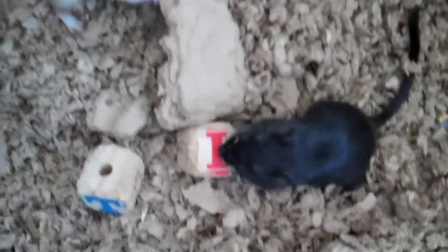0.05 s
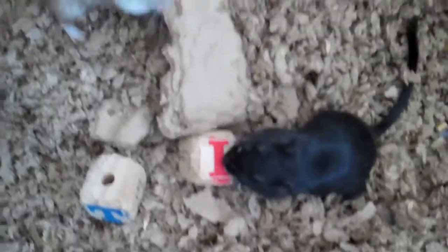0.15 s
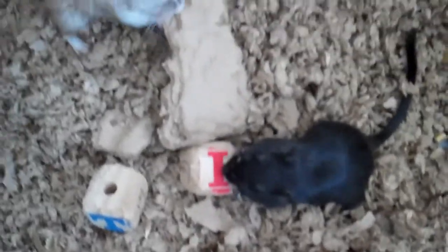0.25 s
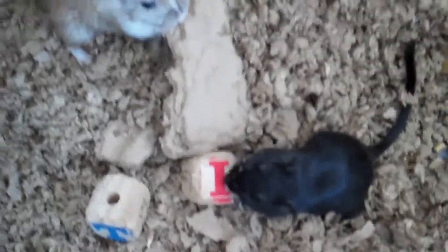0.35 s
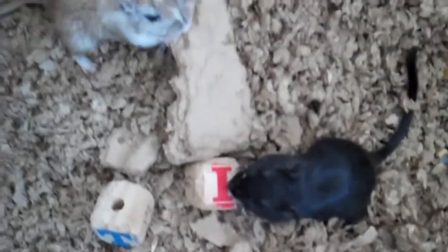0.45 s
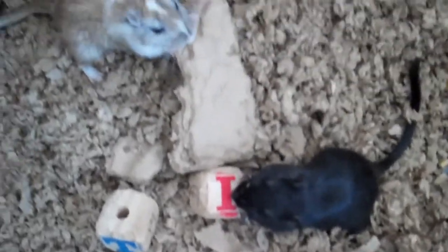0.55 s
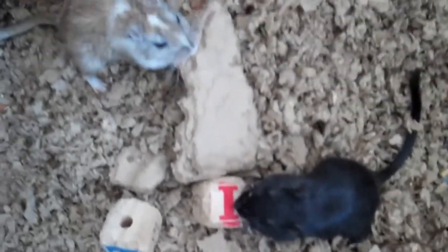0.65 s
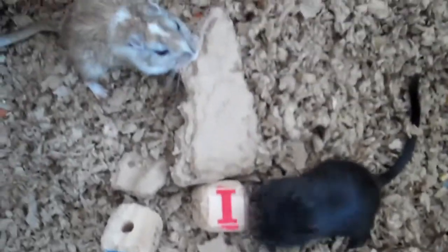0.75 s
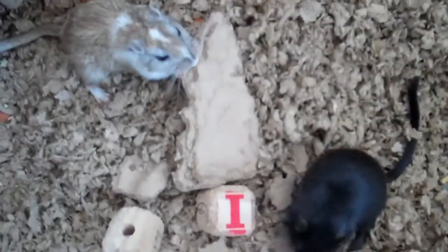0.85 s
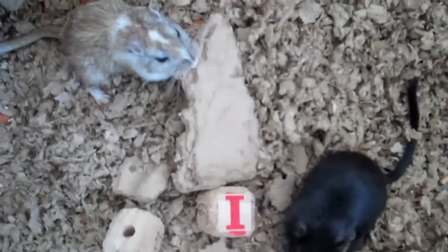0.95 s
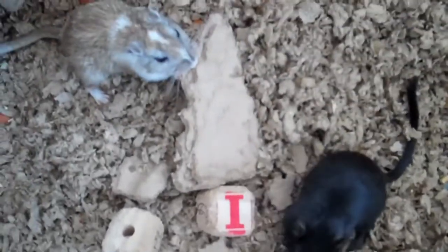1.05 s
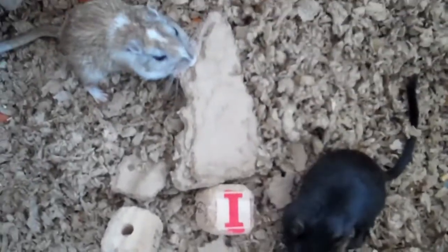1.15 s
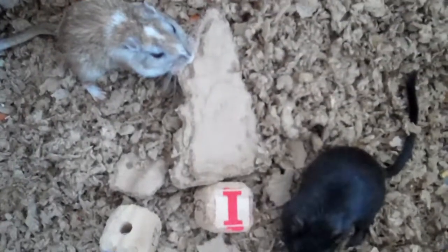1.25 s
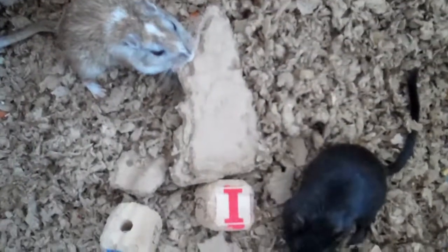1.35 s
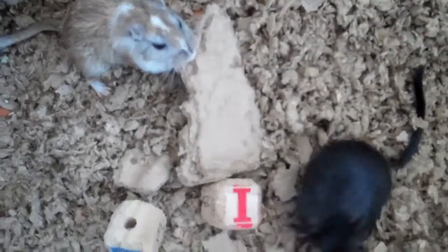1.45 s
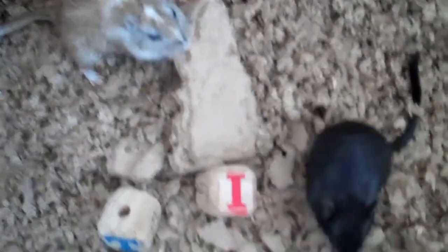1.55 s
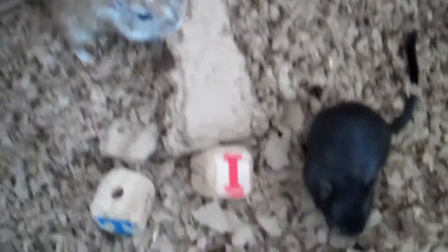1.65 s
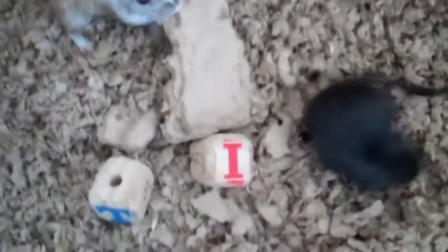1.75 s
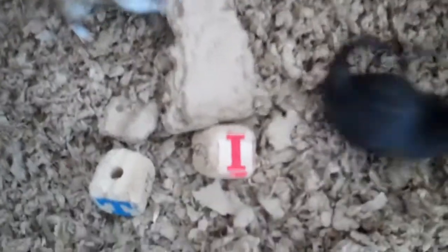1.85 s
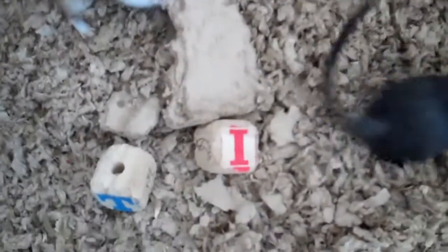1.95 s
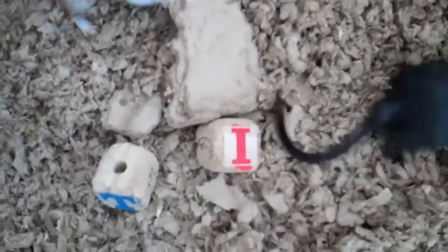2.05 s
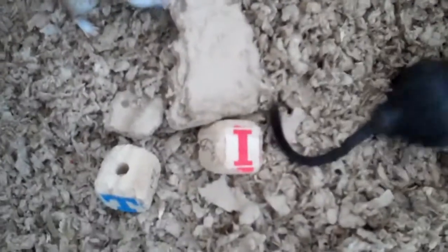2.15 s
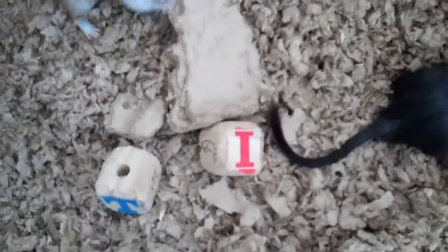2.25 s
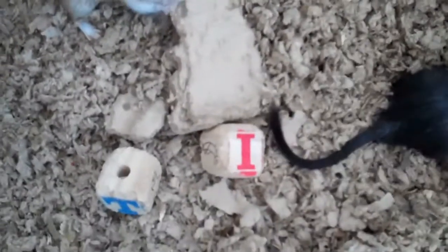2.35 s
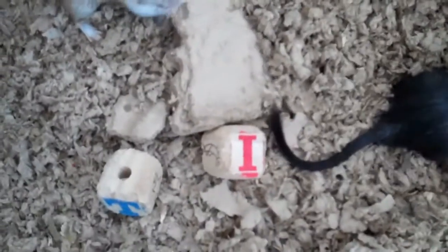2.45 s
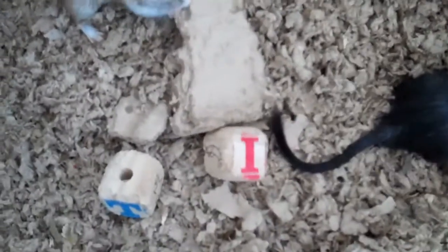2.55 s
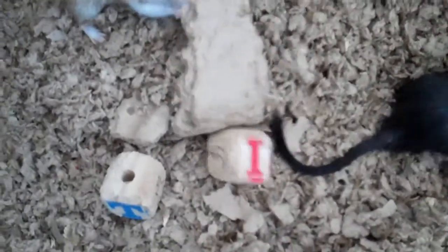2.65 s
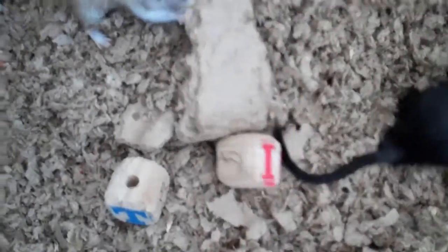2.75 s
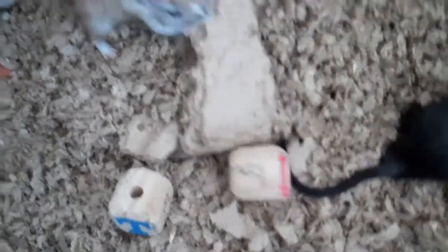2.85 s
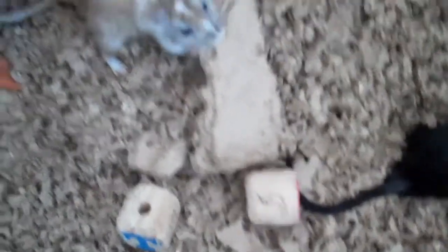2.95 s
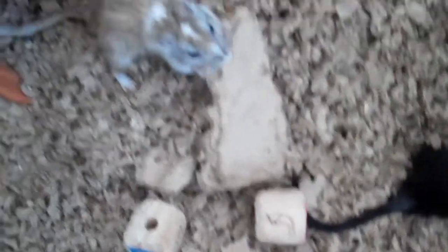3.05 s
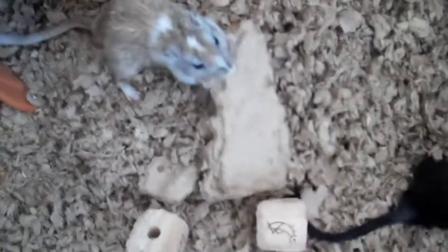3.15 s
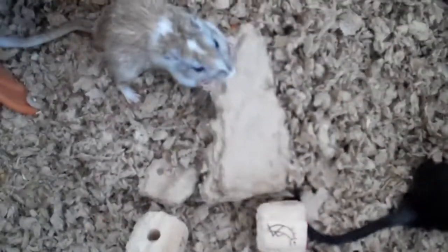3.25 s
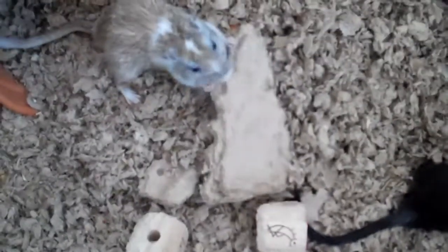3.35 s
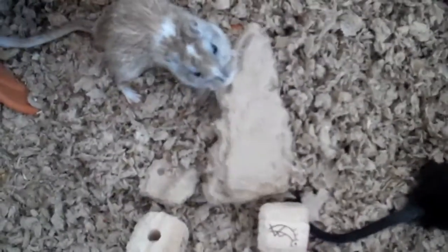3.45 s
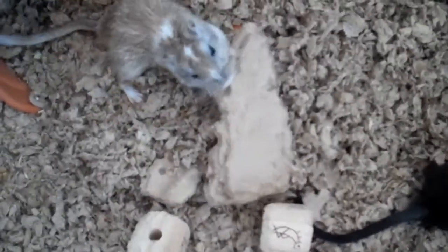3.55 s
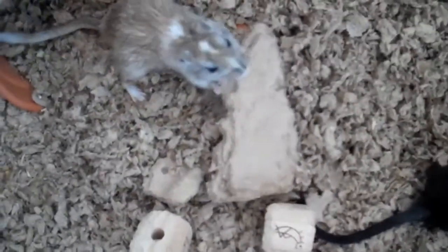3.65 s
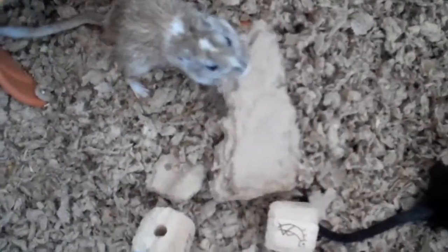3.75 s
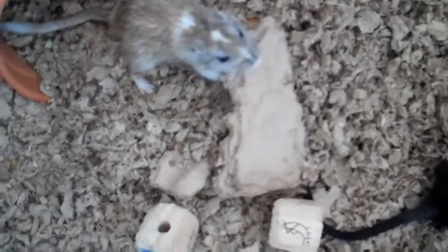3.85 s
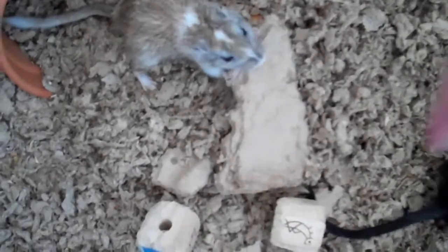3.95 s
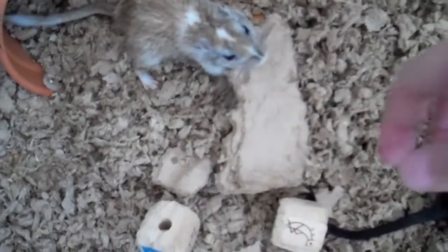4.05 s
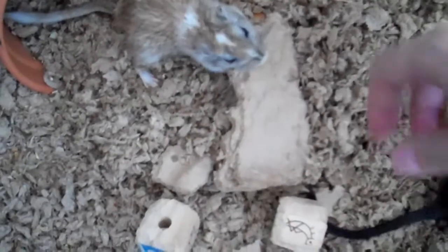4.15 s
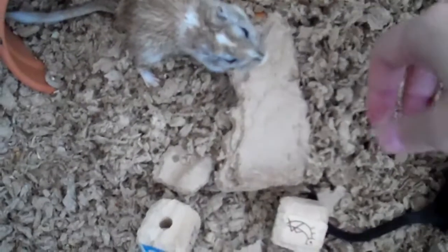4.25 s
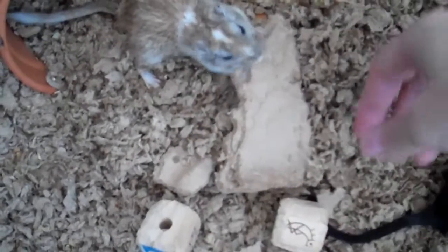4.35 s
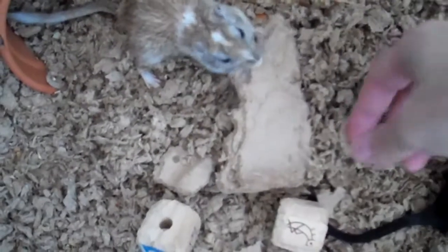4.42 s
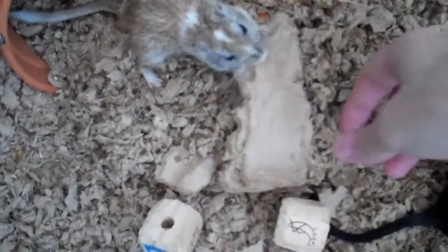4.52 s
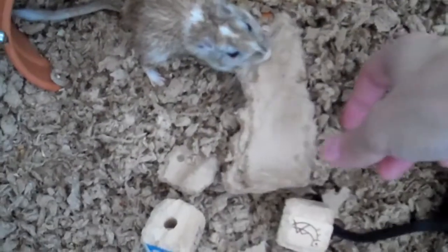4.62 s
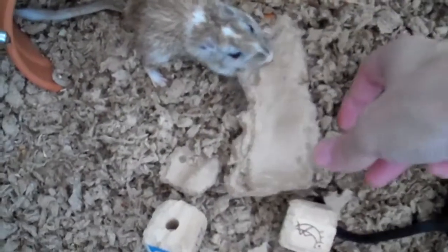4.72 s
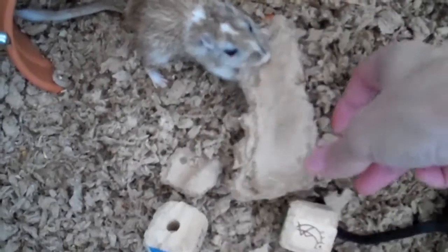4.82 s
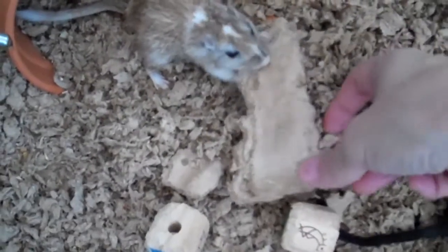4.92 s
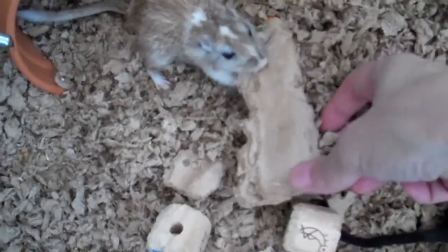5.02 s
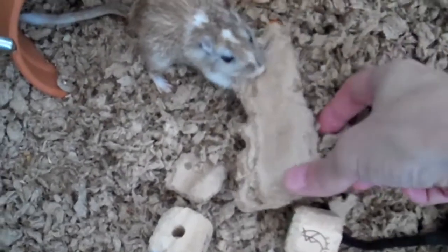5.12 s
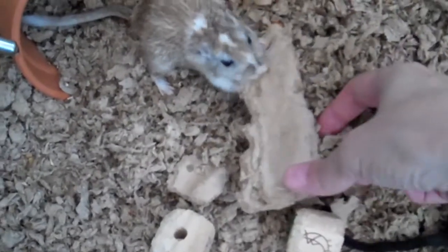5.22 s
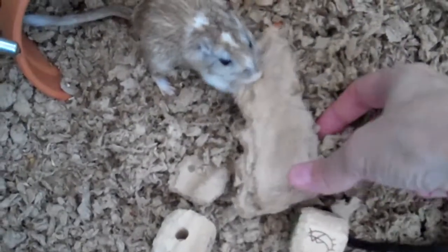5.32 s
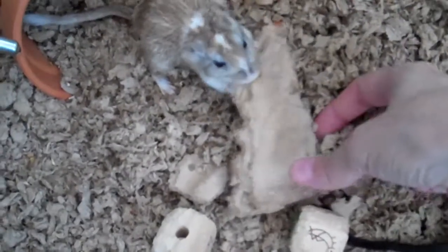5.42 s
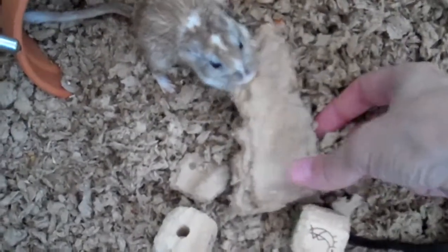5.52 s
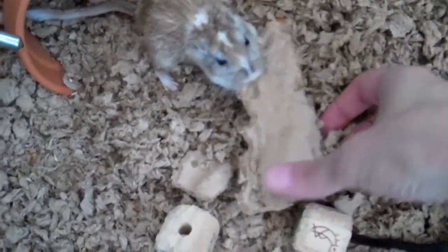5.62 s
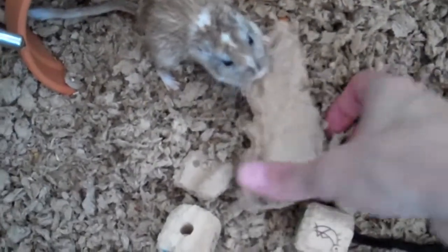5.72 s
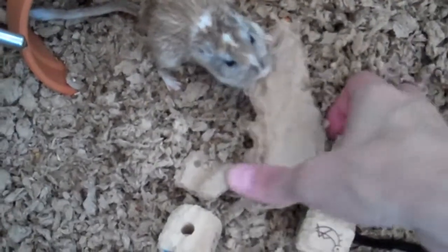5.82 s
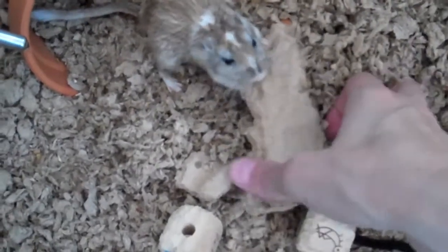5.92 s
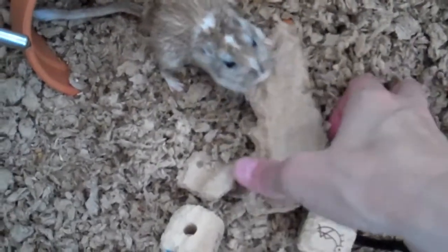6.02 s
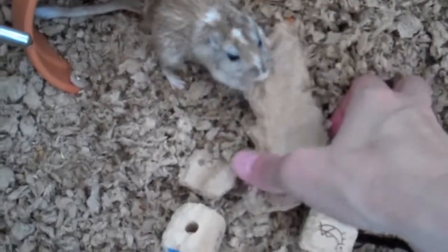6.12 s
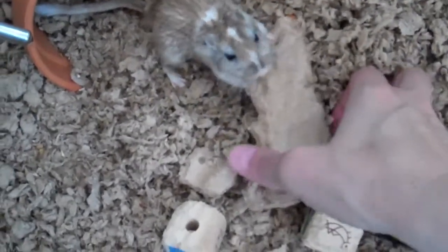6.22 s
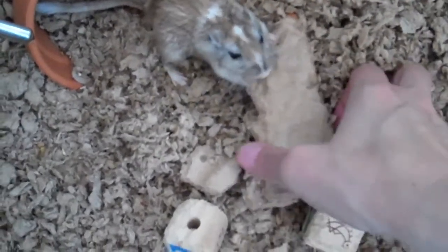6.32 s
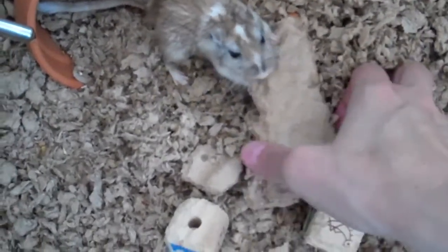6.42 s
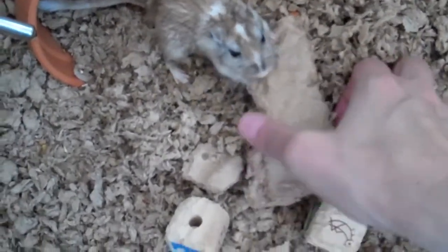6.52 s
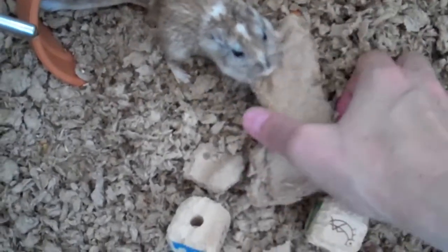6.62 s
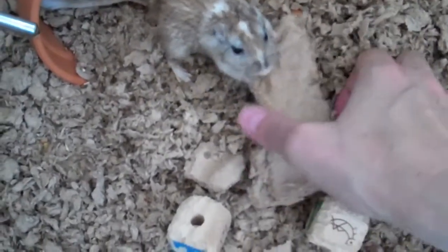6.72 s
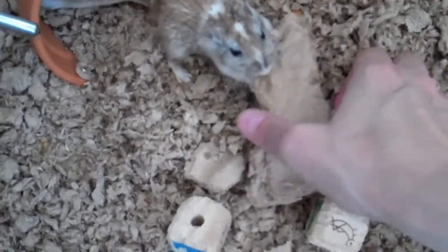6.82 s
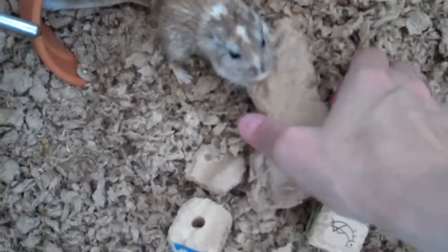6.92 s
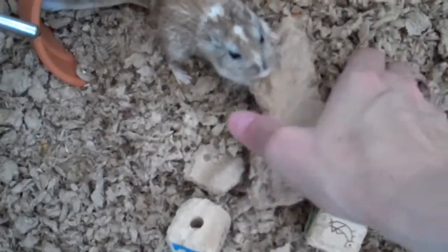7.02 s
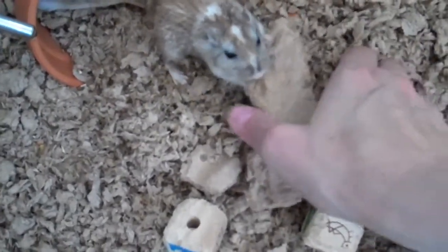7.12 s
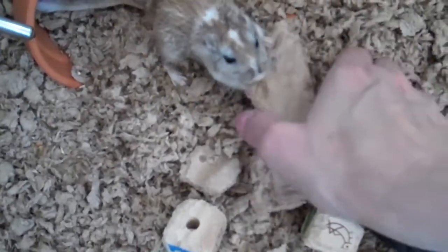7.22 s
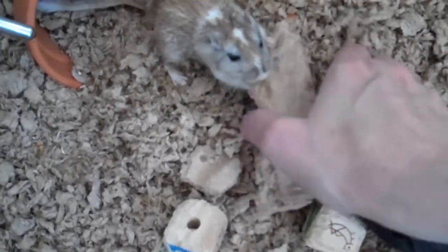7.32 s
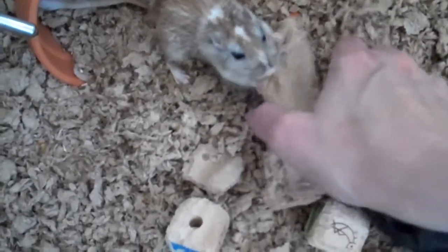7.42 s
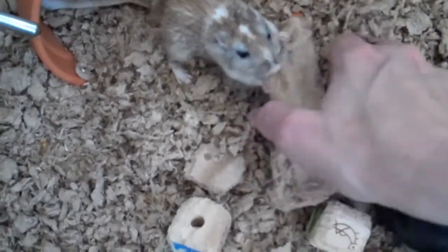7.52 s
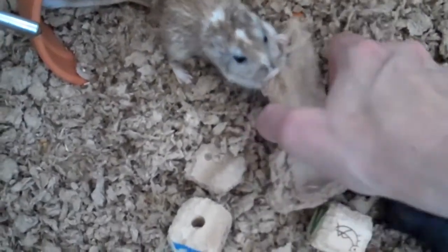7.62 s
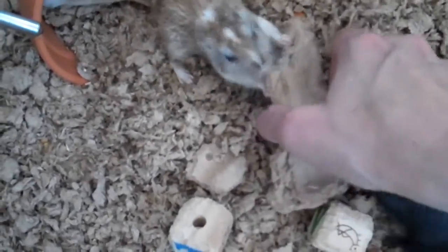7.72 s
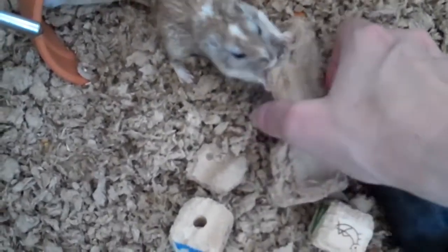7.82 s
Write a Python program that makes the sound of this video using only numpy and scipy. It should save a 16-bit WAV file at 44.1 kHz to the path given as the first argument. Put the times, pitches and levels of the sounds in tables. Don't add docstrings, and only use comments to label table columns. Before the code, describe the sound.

Rapid tooth snaps on wood give way to regular, fibrous nibbling on card, close up, over gentle bedding rustle and faint hiss.

```python
import sys
import numpy as np
from scipy import signal
from scipy.fft import rfft, irfft, next_fast_len
from scipy.io import wavfile
from scipy.ndimage import uniform_filter1d

SR = 44100
rng = np.random.default_rng(int(sys.argv[2]) if len(sys.argv) > 2 else 0)


def gain_from_db(level_db):
    decades = np.asarray(level_db, float) / 20
    return 10 ** decades


def log_audio(samples):
    frames = np.atleast_2d(samples).T
    limited = np.clip(frames, -1, 1)
    pcm = np.round(limited * 32767).astype(np.int16)
    wavfile.write(sys.argv[1], SR, pcm)


N = 347067


def unit(x):
    return x / np.sqrt(np.mean(x ** 2))


def butter(x, order, hz, kind="low"):
    return signal.sosfilt(signal.butter(order, hz, kind, fs=SR, output="sos"), x)


def level_over_time(table):
    s, db = np.transpose(table)
    return np.interp(np.arange(N) / SR, s, db)


def colour(x, points):
    hz, db = np.transpose(points)
    size = next_fast_len(N)
    bins = np.maximum(np.arange(size // 2 + 1) * SR / size, 1)
    gain = gain_from_db(np.interp(np.log(bins), np.log(hz), db))
    return irfft(rfft(x, size) * gain, size)[..., :N]


def walk(rate):
    hold = int(SR / rate)
    steps = np.repeat(rng.standard_normal(N // hold + 1), hold)
    return uniform_filter1d(steps, hold)[:N]


def add(out, s, sound):
    i = int(s * SR)
    out[:, i:i + sound.shape[1]] += sound[:, :N - i]


# frequency in Hz, level in dB per Hz.
AIR_SPECTRUM = [(20, -15), (60, -6), (130, -2), (250, -7.5), (500, -9), (1000, -12), (2500, -11.5),
                (4500, -11), (7000, -17.5), (10000, -25), (13000, -33), (16000, -47)]
# time in seconds, level in dB.
HOUSE_RUMBLE = [
    (0.0, -63),
    (2.72, -69),
    (7.87, -72),
]


def air():
    hiss = colour(rng.standard_normal((3, N)), AIR_SPECTRUM)
    shared = butter(hiss[0] - hiss[1:], 1, 300)
    level_db = -59.5 + np.array([[3.0], [1.5]])
    hiss = unit(hiss[1:] + 0.66 * shared) * gain_from_db(level_db)
    low = butter(rng.standard_normal((3, N)), 2, [28, 50], "band")
    rumble = unit(low[0] + .5 * low[1:])
    return hiss + rumble * gain_from_db(level_over_time(HOUSE_RUMBLE) - 3.0)


# time in seconds, level in dB.
DIGGING = [(0.0, -59.5), (0.2, -55.5), (0.9, -60.5), (1.35, -63.5), (1.63, -52.5), (2.22, -56),
           (2.5, -53.5), (2.9, -68), (3.3, -85), (3.55, -56.5), (4.45, -63.5), (4.9, -56), (7.0, -60.5),
           (7.86, -53.5)]
# middle in seconds, length in seconds, level in dB.
SCRAPES = [(0.106, 0.045, -57), (0.41, .05, -51.5), (1.013, 0.1, -53), (1.491, 0.032, -52.5),
           (1.95, 0.36, -51.5), (2.386, 0.1, -54), (2.595, 0.027, -46), (2.77, 0.078, -50),
           (3.058, 0.25, -53.5), (3.67, 0.078, -57), (3.853, 0.29, -57), (4.11, .1, -55),
           (4.303, 0.043, -57.5), (4.621, 0.092, -49), (4.825, .04, -53), (5.273, 0.063, -51.5),
           (5.527, 0.044, -55), (6.306, 0.062, -51), (6.456, 0.23, -53), (6.57, .05, -57),
           (6.684, .05, -52), (7.109, 0.062, -52), (7.28, 0.086, -51), (7.495, .05, -50.5),
           (7.708, 0.073, -67), (7.58, 0.093, -52), (7.793, 0.069, -54), (7.86, .1, -44.5)]


def stirring():
    t = np.arange(N) / SR
    power = gain_from_db(2 * level_over_time(DIGGING))
    for middle, length, db in SCRAPES:
        swell = np.clip(1 - (2 * (t - middle) / length) ** 2, 0, 1) ** 2
        power = power + gain_from_db(2 * db) * swell
    return 10 * np.log10(power)


# frequency in Hz, level in dB per Hz.
SHAVINGS = [(900, 0), (2000, 4.5), (4000, 6), (5500, -2.5), (8000, -3.5), (11000, -10.5), (15000, -22.5)]


def rustle(density=.15, spread_db=2.8, apart=.5):
    size_db = spread_db * np.minimum(rng.exponential(size=(2, N)), 3)
    struck = rng.random((2, N)) < density
    flakes = rng.standard_normal((2, N)) * struck * gain_from_db(size_db)
    gusts_db = stirring() - 5 + 3 * walk(30)
    mid, side = unit(colour(flakes, SHAVINGS)) * gain_from_db(gusts_db)
    both = np.array([mid + apart * side, mid - apart * side])
    bright = butter(both, 2, 6000, "high")
    treble_db = 8
    return (both + (gain_from_db(treble_db) - 1) * bright) * gain_from_db([[.8], [-.8]])


def body(modes, size=512):
    t = np.arange(size) / SR
    hz, width, db = (c[:, None] for c in np.transpose(modes))
    slip = 1 - np.exp(-t / .00006)
    rings = gain_from_db(db) * np.exp(-np.pi * width * t) * np.sin(2 * np.pi * hz * t) * slip
    stiff = butter(rings, 6, 1450, "high")
    groups = np.digitize(hz[:, 0], [1400, 2800, 5200]) == np.arange(4)[:, None]
    return np.where(hz > 1400, stiff, rings), groups


def broken(*tables, knock_db=0, splinters=2):
    rows = np.concatenate(tables)
    chance = rng.random((len(rows), splinters, 3))
    late = .012 * chance[..., 0] + .002
    softer = -15 - 8 * chance[..., 1]
    brighter = 12 * chance[..., 2] - 6
    small = rows[:, None] + np.stack([late, softer, brighter], axis=2)
    s, peak_db, bright_db = np.concatenate([rows, small.reshape(-1, 3)]).T
    middle_db = 5 - 0.1 * np.abs(bright_db) / 2
    rings_db = np.array([-bright_db / 2, middle_db, bright_db / 2])
    total_db = 10 * np.log10(np.sum(gain_from_db(2 * rings_db), axis=0))
    rings_db = rings_db - total_db + peak_db - 0.5
    knocks_db = -45 + knock_db + 0.77 * (peak_db + 21)
    return np.column_stack([s, knocks_db, *rings_db])


def snaps(table, modes, pans_db, tear_db, crumble_db, apart, size=1280):
    out, t = np.zeros((2, N)), np.arange(size) / SR
    rings, groups = body(modes)
    tearing = gain_from_db(tear_db - 60 * t / .010)
    crumbling = gain_from_db(crumble_db - 60 * t / .07)
    for (s, *peaks_db), pan_db in zip(table, pans_db):
        grip = groups * gain_from_db(2.5 * rng.standard_normal(len(modes)))
        sparse = rng.random((2, size)) < .15
        fibres = rng.standard_normal((2, size)) * sparse * (tearing + crumbling)
        fibres[:, 0] = np.clip((max(peaks_db) + 44.5) / 16, .2, 1), 0
        mid, side = signal.fftconvolve((grip @ rings)[None], fibres[:, None], axes=2)[..., :size]
        force = gain_from_db(peaks_db) / np.abs(mid).max(axis=1)
        mid, side = force @ mid, force * apart @ side
        pan = gain_from_db([[pan_db / 2], [-pan_db / 2]])
        add(out, s - .0002, np.array([mid + side, mid - side]) * pan)
    return butter(out, 4, 290, "high")


# frequency in Hz, width in Hz, level in dB.
BLOCK = [(490, 500, -9), (780, 320, -13), (1150, 130, -13), (2000, 750, -43), (2690, 870, 6.5),
         (3300, 260, -1.5), (3970, 430, 6.5), (4600, 1100, 5.5), (6340, 1770, 2.5), (8150, 1030, -4.5),
         (9300, 490, -18.5)]
# start in seconds, peak in dB, brightness in dB.
BLOCK_BITES = [(0.1383, -15.5, 8), (0.1599, -23, -4), (0.164, -28, 15), (0.1713, -18, 2), (0.175, -30, -11),
               (0.181, -16.5, -11), (0.272, -21, -4), (0.278, -33, 9), (0.2816, -32, 2), (0.3104, -32, 7),
               (0.3176, -27, 7), (1.5729, -33, -3), (1.5781, -36, 14), (1.6007, -29, -7),
               (1.6057, -10.5, -0.5), (1.6437, -36, 13), (1.725, -24, 6), (1.7308, -30, -3),
               (1.7385, -22, 2), (1.7409, -30, -26), (2.507, -18.5, 2), (2.5418, -35, 0),
               (2.5555, -10.5, 9.5), (2.5666, -41, 1), (2.5714, -33, 0), (2.5805, -23.5, 10),
               (2.5854, -24.5, 11), (2.7508, -23.5, 10), (2.7658, -26.5, 17), (2.7741, -31, -1)]
# start in seconds, peak in dB, brightness in dB.
BEDDING_TICKS = [(0.0681, -32, 6), (0.1076, -40.5, -16), (0.4143, -35.5, 3), (0.422, -33.5, 3),
                 (0.5826, -48, -23), (1.696, -40.5, 14), (1.873, -30, 23), (1.8859, -30.5, 32),
                 (1.927, -39, -4), (1.9583, -32, 20), (1.962, -26.5, 15), (2.295, -38.5, 15),
                 (2.389, -30.5, 18), (2.398, -26, 15), (2.4058, -34, 6), (2.7367, -39, 0), (2.809, -42, 15),
                 (3.063, -42, 2), (3.1157, -38, 15), (3.1292, -39, 28), (3.6147, -37.5, 15),
                 (3.6753, -32, 31), (3.695, -39, 2), (3.7696, -39, -8), (3.808, -39.5, 21),
                 (3.8607, -39, 17), (4.0943, -40.5, 9), (4.124, -35.5, 35), (4.151, -35, 43),
                 (4.278, -39.5, 17)]


def wooden_snaps():
    breaks = broken(BLOCK_BITES, BEDDING_TICKS, knock_db=3)
    pans_db = 2.4 + 1.5 * rng.standard_normal(len(breaks))
    return snaps(breaks, BLOCK, pans_db, tear_db=-10, crumble_db=-27, apart=[.3, .4, .7, 1.0])


# frequency in Hz, width in Hz, level in dB.
CARD = [(387, 15, -28), (556, 110, -15), (751, 107, -19.5), (1164, 57, -28.5), (1923, 175, -12),
        (2110, 210, 0), (2634, 266, 2), (3220, 280, 14), (3890, 230, 12), (4060, 240, 12), (4340, 730, 23),
        (5560, 1200, 3), (6870, 1130, 2), (8640, 970, -15)]
# start in seconds, peak in dB, brightness in dB.
CARD_RUN_1 = [(4.5884, -38.5, 12), (4.6255, -26.5, 3), (4.6341, -23.5, 6), (4.6671, -39, 11),
              (4.7529, -33.5, 2), (4.7605, -14.5, 7), (4.7715, -16, 11), (4.7768, -22.5, -2),
              (4.9065, -15, 16), (4.912, -28, 8), (4.925, -26, -1), (4.9396, -17, -3), (4.9421, -9.5, 0),
              (4.9727, -35.5, 11), (5.0759, -27, 6), (5.0846, -30, 5), (5.0935, -16, 2),
              (5.1035, -14.5, 16), (5.1091, -19.5, 3), (5.1172, -25, 13), (5.1225, -27, -1),
              (5.1507, -35.5, 20), (5.2493, -33, 12), (5.306, -19.5, 12), (5.3133, -20.5, 3.5),
              (5.3527, -45, 13), (5.4562, -26.5, 3), (5.4665, -20, 0), (5.4748, -13, 10.5),
              (5.5084, -31.5, 12)]
CARD_RUN_2 = [(5.68, -33, 7), (5.6867, -36, 8), (5.7514, -34, 28), (5.8355, -18.5, 19), (5.845, -36, -1),
              (5.8518, -19, 19), (5.8579, -30, -8), (5.8684, -18, 3), (5.879, -25.5, -3),
              (5.9274, -27.5, 20), (6.0378, -26.5, 11), (6.0456, -27, 4), (6.0594, -11.5, 17),
              (6.075, -26.5, -2), (6.0886, -28.5, 4), (6.1327, -36, 9), (6.2526, -34, 5),
              (6.2586, -20.5, -0.5), (6.266, -24, 13), (6.2705, -24, 2), (6.2749, -22, 3), (6.2781, -31, 7),
              (6.2834, -32, -1), (6.2973, -26, -3), (6.3516, -36, 6), (6.4434, -51, 6), (6.489, -35, 6),
              (6.5761, -39.5, 13), (6.6473, -25.5, 11), (6.6573, -33, 5)]
CARD_RUN_3 = [(6.8319, -20.5, 10), (6.842, -41, 2), (6.85, -24, 10), (6.8543, -35, 8), (6.8596, -24.5, 4),
              (6.8641, -27, -1), (6.876, -37, -17), (6.8824, -35.5, 2), (7.0422, -33, 2),
              (7.0511, -14.5, 9), (7.0615, -16.5, 4), (7.0708, -16.5, 1), (7.0733, -35, 0),
              (7.0973, -44, 0), (7.2442, -26.5, 7), (7.2535, -37, -6), (7.2695, -32, -3),
              (7.2834, -30.5, 4), (7.2893, -34, -4), (7.3052, -37, 11), (7.455, -23, -1),
              (7.4589, -22.5, 9), (7.464, -25, 4), (7.473, -48, -4), (7.4813, -35.5, -1), (7.499, -39, -7),
              (7.66, -38.5, 10), (7.6768, -39, -4), (7.7115, -26.5, 5), (7.8263, -34, 16)]


def card_snaps():
    breaks = broken(CARD_RUN_1, CARD_RUN_2, CARD_RUN_3)
    pans_db = np.full(len(breaks), 2.2)
    return snaps(breaks, CARD, pans_db, tear_db=-4, crumble_db=-25, apart=[.3, .25, .45, .7])


# delay in ms, level in dB.
TANK_ECHOES = [
    (1.1, -17),
    (1.9, -25.5),
]


def tank(x, tail_db=-39, t60=.065):
    t = np.arange(SR // 6) / SR
    haze = rng.standard_normal((3, len(t))) * gain_from_db(tail_db - 60 * t / t60) * (t > .001)
    walls = haze[0] + .5 * haze[1:]
    walls[:, 0] = 1
    for ms, db in TANK_ECHOES:
        delays = (ms * SR / 1000 + np.array([0, 2])).astype(int)
        walls[[0, 1], delays] += gain_from_db(db)
    return signal.fftconvolve(x, walls, axes=1)[:, :N]


# start in seconds, peak in dB, pitch in Hz.
THUDS = [(2.011, -42, 197), (2.104, -42.5, 171.5), (2.769, -53, 170), (3.079, -58, 173), (5.05, -49, 132),
         (5.3, -54, 173), (5.6, -57.5, 170), (5.93, -52, 150), (6.32, -52, 150), (5.845, -42.5, 177),
         (6.018, -50, 201), (6.237, -41, 169.4), (6.413, -43.5, 182.5), (6.572, -50, 166),
         (7.298, -52, 175), (7.607, -57, 173)]


def thuds():
    out, t = np.zeros((2, N)), np.arange(SR // 5) / SR
    push = 1 - np.exp(-t / 0.00043)
    for s, peak_db, hz in THUDS:
        hum = np.sin(2 * np.pi * hz * t) + 0.24 * np.sin(2.6 * np.pi * hz * t)
        hum = hum * push * gain_from_db(peak_db - 6 - 60 * t / 0.22)
        add(out, s, np.array([hum, 0.92 * hum]))
    return out


def scene():
    gnawing = wooden_snaps() + card_snaps()
    return tank(gain_from_db(1.5) * gnawing + rustle()) + thuds() + air()


def low_pass(x):
    return signal.sosfilt(signal.butter(12, 16500, fs=SR, output="sos"), x)


def record(dry):
    left, right = dry
    dull = np.array([butter(left, 6, 14300), butter(right, 6, 12600)])
    return low_pass(dull - .0004)


dry = scene()
out = record(dry)
log_audio(out)
```